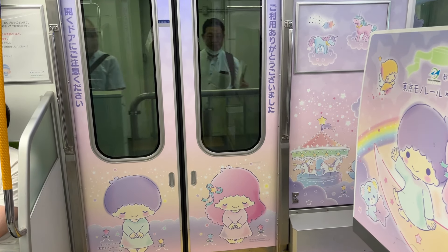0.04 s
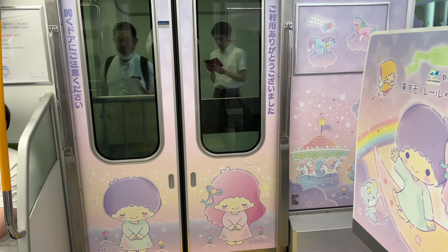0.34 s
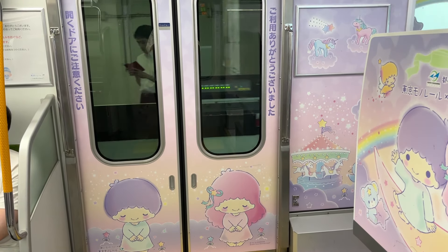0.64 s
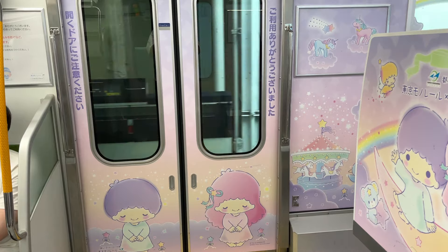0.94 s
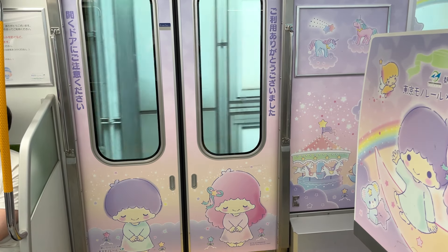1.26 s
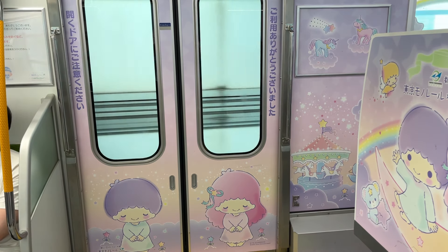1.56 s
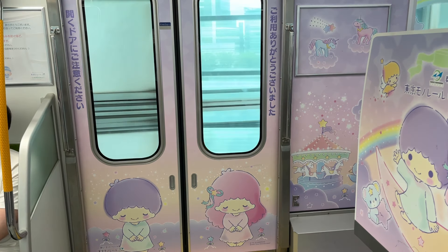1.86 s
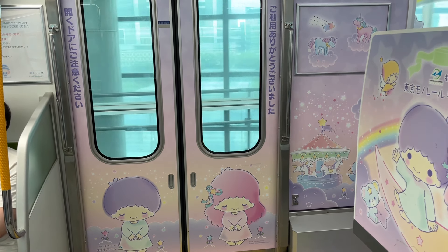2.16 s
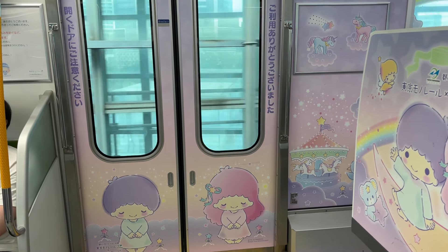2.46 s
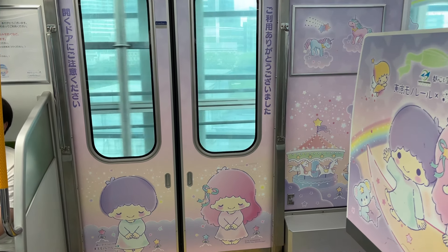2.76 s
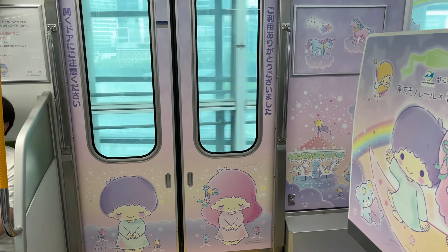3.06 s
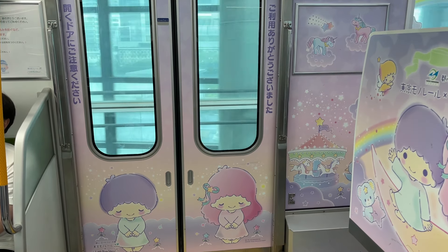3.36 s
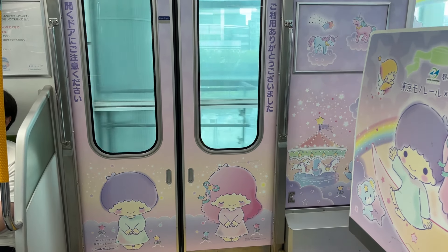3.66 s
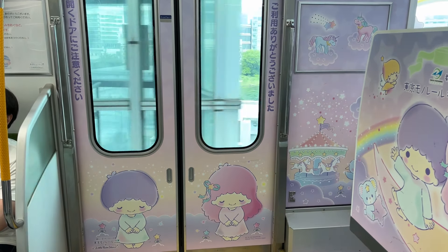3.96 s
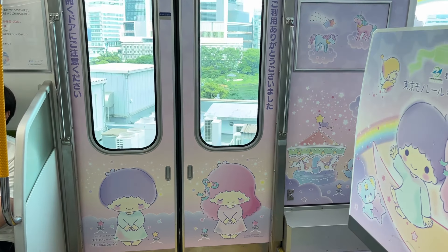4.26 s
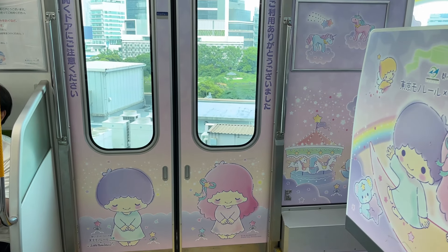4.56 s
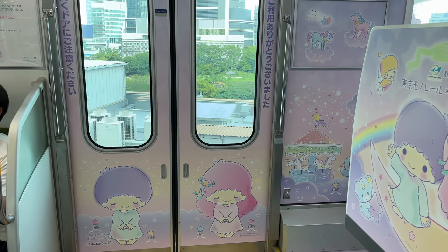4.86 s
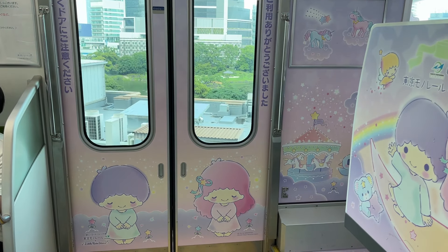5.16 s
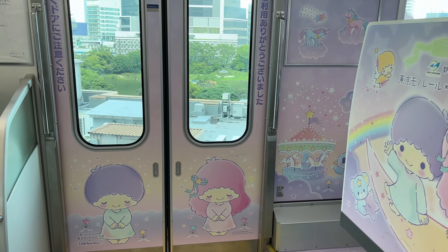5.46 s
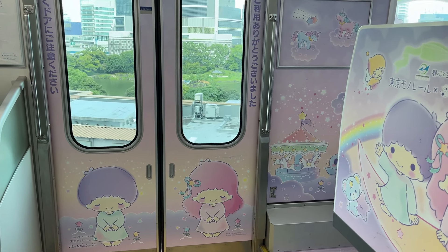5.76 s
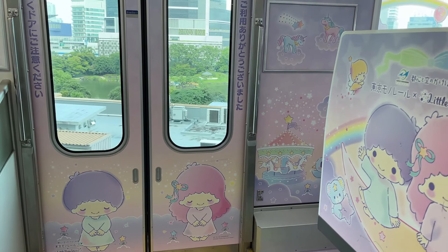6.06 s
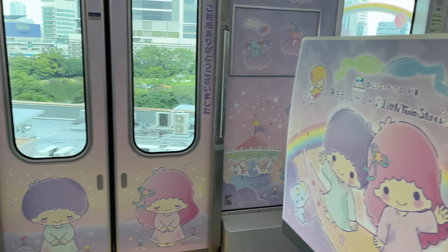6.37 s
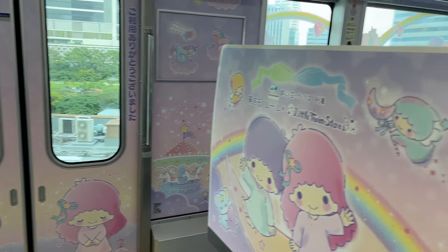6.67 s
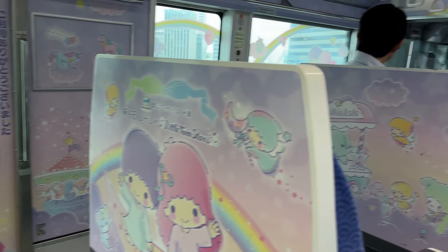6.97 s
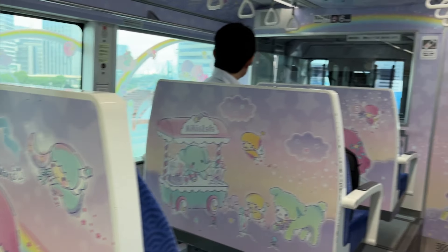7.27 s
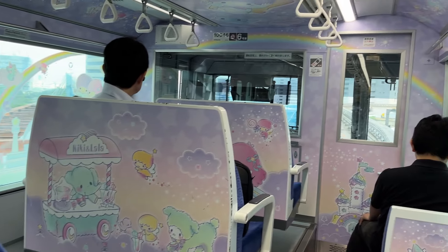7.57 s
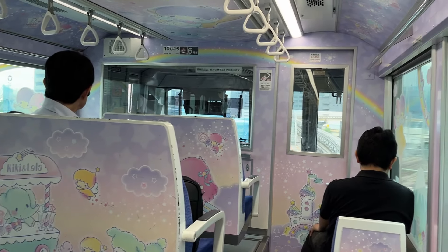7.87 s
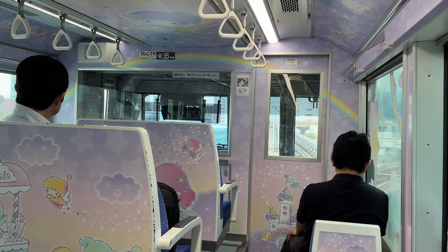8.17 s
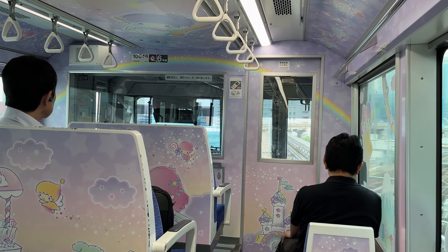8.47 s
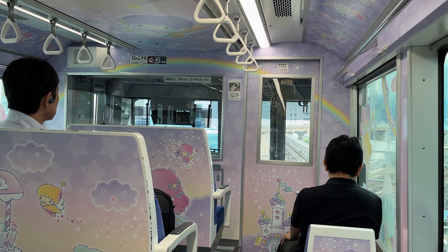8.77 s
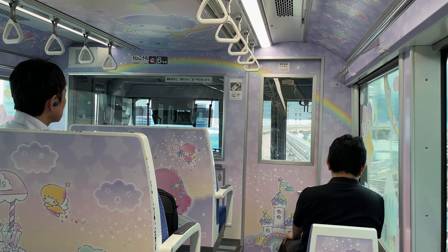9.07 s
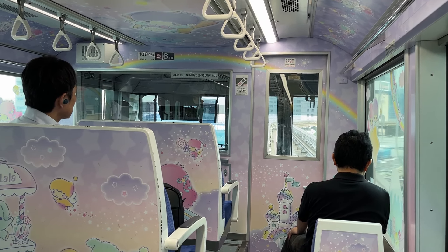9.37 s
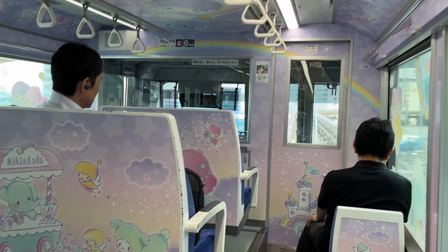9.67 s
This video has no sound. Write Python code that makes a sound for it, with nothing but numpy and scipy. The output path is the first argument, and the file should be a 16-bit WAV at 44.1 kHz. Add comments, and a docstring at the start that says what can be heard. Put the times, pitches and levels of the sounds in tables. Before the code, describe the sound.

A monorail car runs at steady speed, heard from inside the cabin. Deep tyre rumble, an electrical hum and a soft vent hiss continue for the whole ten seconds or so. A low drone dips around 2.5 seconds and swells back by 4. Small hard fixtures click lightly at the start, in a cluster between 2.4 and 2.8 seconds, at 4.1 and again around 5.6. Faint rustles, like cloth or a bag, come and go, with a short squeaky scrape at 6 seconds. A thin motor whine emerges at about 3.5 seconds and fades by 9. At 6.7 seconds the car knocks hard and dully over a joint, and its panels shudder for a third of a second. The hum shifts between the ears as the microphone turns, from 6.5 to 7.4 seconds. Softer bumps follow around 8.1 and 9.3 seconds as the ride grows slightly rougher.

```python
"""Inside a monorail car at steady speed.

Tyres rumble on the beam, the running gear drones in slow swells, the power supply hums, vents blow.
Light clicks, rustles and a scrape sound in the cabin. The car knocks hard over a joint in the beam,
shudders and takes a few softer bumps. The hum shifts as the microphone turns to the front."""
import sys
import numpy as np
from scipy import signal
from scipy.fft import rfft, irfft, next_fast_len
from scipy.io import wavfile
from scipy.ndimage import uniform_filter1d, minimum_filter1d, map_coordinates

SR = 44100
rng = np.random.default_rng(int(sys.argv[2]) if len(sys.argv) > 2 else 0)


def waveform_to_disk(signal):
    """Save audio, clipped to [-1, 1], as 16-bit WAV at the path in sys.argv[1]."""
    frames = np.transpose(np.atleast_2d(signal))
    scaled = np.clip(frames, -1, 1) * 32767
    samples = np.round(scaled).astype(np.int16)
    wavfile.write(sys.argv[1], SR, samples)


N = 428652

DRONE_HZ, SUPPLY_HZ = 95.65, 120
TURN_START_S, TURN_LENGTH_S = 6.44, 0.94
EAR_SPLIT = np.array([[.5], [-.5]])  # half a left-right difference to each ear

# Cabin noise coherence. Each row: frequency in Hz, left-right correlation.
EAR_COHERENCE = [(45, .99), (90, .97), (140, .86), (290, .6), (630, .35), (1300, -.05), (2500, .25),
                 (4500, .1), (6500, 0), (8300, -.6), (10500, .4), (14000, 0)]
# Cabin noise balance. Each row: frequency in Hz, left minus right in dB.
EAR_BALANCE_DB = [(60, -1), (200, -0.5), (400, 1), (700, 2), (1270, -1), (2330, 2), (4300, 7), (8000, -0.5),
                  (14000, 0)]
# Cabin decay. Each row: frequency in Hz, T60 in seconds.
CABIN_T60_S = [(200, .35), (3000, 0.38), (8000, 0.24), (15000, 0.18)]
# Airy hiss of vents and tyres. Each row: frequency in Hz, relative density in dB.
AIR_SPECTRUM_DB = [(500, -20), (1500, -2.5), (2000, -2.3), (2550, .5), (3500, -3.8), (5000, -8),
                   (6200, -11), (7300, -15), (8300, -30), (9500, -23), (11000, -23), (13000, -25.5),
                   (15000, -32)]
# Fine high tyre hiss. Each row: frequency in Hz, relative density in dB.
FIZZ_SPECTRUM_DB = [(5000, -14), (7200, -8), (8300, -30), (9600, 0), (12000, -1), (15000, -8)]
# Slow swells of the drone's fundamental. Each row: time in seconds, level in dB.
DRONE_SWELL_DB = [(0, -25.5), (.9, -25), (1.7, -28.5), (2.5, -37.5), (3.5, -35), (4.3, -26), (6, -25),
                  (7.4, -29.5), (8.4, -29.5), (9.3, -23), (9.7, -25)]
# Upper drone orders. Each row: multiple of DRONE_HZ, level in dB.
DRONE_HARMONICS = [(3, -51), (4, -45.5), (10, -56), (11, -59), (13, -60.5)]
# Upper supply orders. Each row: multiple of SUPPLY_HZ, level in dB.
SUPPLY_HARMONICS = [(5, -57), (6, -62), (24, -76), (28, -72), (40, -79)]
# Drone order 2, facing door then front. Each row: left in dB, right in dB, left lead in radians.
DRONE_2_EARS = [(-42, -37.5, -1.6), (-34, -29.8, -.1)]
# Supply order 3, facing door then front. Each row: left in dB, right in dB, left lead in radians.
SUPPLY_3_EARS = [(-48, -40, 1.3), (-34.5, -48, 1.4)]
# Supply order 4, facing door then front. Each row: left in dB, right in dB, left lead in radians.
SUPPLY_4_EARS = [(-47, -47.2, -.25), (-58, -50, -1.5)]
# Thin fan and motor whines. Each row: frequency in Hz, level in dB.
STEADY_WHINES = [(533, -58), (1469, -66), (3052, -72), (7284, -86)]
# Swelling motor whine. Each row: time in seconds, frequency in Hz, level in dB.
MOTOR_TRACK = [(3.2, 886, -72), (3.6, 887, -55), (4.1, 888, -51.5), (5.3, 888.5, -52), (6.6, 886.5, -54),
               (7.25, 885.5, -48), (7.55, 885.5, -59), (8.6, 885, -57.5), (9.1, 884, -72)]
# Tyre rumble. Each row: frequency in Hz, relative density in dB.
RUMBLE_SPECTRUM_DB = [(15, -62), (26, -22), (36, -15.5), (45, -4.5), (56, 3), (70, -5), (88, 0.5),
                      (115, -11), (200, -26.5), (500, -93)]
# Car body boom. Each row: frequency in Hz, relative density in dB.
BOOM_SPECTRUM_DB = [(50, -15.5), (90, -1.5), (120, 2.5), (180, 0), (210, -7), (260, -7.5), (400, -23),
                    (700, -24), (2000, -79.5)]
# Tyre roar. Each row: frequency in Hz, relative density in dB.
ROAR_SPECTRUM_DB = [(90, -38.5), (220, 2), (330, 5), (450, 1.5), (620, -2.5), (800, -3), (1050, -4),
                    (1280, -8.5), (1560, -11), (1750, -15), (2600, -22.5), (6000, -80)]
# Tyre noise off trackside walls. Each row: frequency in Hz, relative density in dB.
WALL_SPECTRUM_DB = [(900, -15.5), (1300, -6.5), (1430, 2), (1580, -6.5), (1750, -11), (2500, -16.5),
                    (5000, -30.5), (8000, -54)]
# Rough stretches of beam. Each row: start in seconds, length in seconds, extra shaking in dB.
ROUGH_STRETCHES = [(.61, 0.073, 2), (2.546, 0.22, 2.5), (3.91, 0.43, 5.5), (5.477, 0.47, 5), (6.19, .12, 4),
                   (6.635, 0.36, 7), (7.85, 0.46, 6.5), (8.55, 0.28, 6), (9.032, 0.4, 7)]
# Small hard fixtures clicking. Each row: start in seconds, strength in dB, treble lift in dB,
# left minus right below the treble in dB, attack in seconds.
FIXTURE_CLICKS = [(.085, -18, 0.5, 6, .002), (0.188, -11.5, -21, 5, .003), (2.357, -3.5, -1, 6, 0.0012),
                  (2.517, -10.5, -8, 7, .001), (2.7716, 1, -2.5, 7, 0.00033), (2.779, -5, -5, 2.5, 0.0011),
                  (2.793, -8.5, -4, 4, .001), (4.102, -6, -1, 5, .008), (5.58, -5.3, 2.5, 4, .0005),
                  (5.671, -9, 0.5, 5, .0005), (5.7895, -11.5, -4, 6, 0.0053), (7.85, -22.5, 3, 2, .002)]
# Ring of the fixtures. Each row: frequency in Hz, relative level in dB, T60 in seconds.
FIXTURE_MODES = [(1335, -12, .09), (1943, -13, .09), (3160, -6, .1), (3472, 0, .04), (3989, -8, .08),
                 (4813, -9, .04)]
# Click colour. Each row: frequency in Hz, gain in dB.
CLICK_EQ_DB = [(400, -21), (1300, 0), (2200, 2), (3300, 0), (5000, 0.5), (7200, -3), (8300, -16),
               (9500, -4.5), (12000, -5), (15000, -12)]
# Rustles and scuffs. Each row: peak time in seconds, level in dB, half length in seconds,
# band centre in Hz, treble lift in dB.
RUSTLE_EVENTS = [(0.207, -49, 0.037, 4600, -8), (0.62, -51.5, 0.032, 6000, -8),
                 (1.17, -48.5, 0.051, 3350, -10), (2.625, -51.5, 0.017, 4500, -4),
                 (2.714, -52.5, 0.045, 3600, 3), (4.189, -47.5, .036, 2700, -13),
                 (4.365, -47.5, .055, 3140, -10), (4.566, -46.5, 0.05, 3080, -13),
                 (5.249, -46, 0.038, 2980, -15.5), (6.041, -47.5, 0.081, 4500, 3),
                 (6.085, -46, 0.099, 2250, -2), (6.13, -48, .06, 1460, -4), (6.318, -58, 0.1, 10700, 4),
                 (8.447, -51.5, 0.07, 5460, -1), (8.549, -48.5, .025, 2900, -10),
                 (8.693, -48.5, 0.025, 5250, -7.5), (8.93, -50, .03, 3000, -9),
                 (9.114, -47, 0.052, 4200, -2), (9.22, -50.5, .09, 3800, -1)]
# Rustle colour. Each row: frequency in Hz, relative density in dB.
RUSTLE_SPECTRUM_DB = [(600, -25), (1300, 3), (2200, 1.5), (3500, 0), (5200, -3), (7300, -8), (8300, -18),
                      (9500, -10.5), (12000, -11.5), (15000, -19)]
# Catches of a scrape. Each row: peak time in seconds, level in dB, half length in seconds, pitch in Hz.
SCRAPE_SQUEAKS = [(6.02, -51, .014, 4650), (6.028, -46.5, .008, 3920), (6.052, -47, .012, 2880),
                  (6.064, -49, .014, 2200), (6.076, -48, .014, 3660), (6.117, -37.5, .005, 1340)]
# Panel shudder. Each row: frequency in Hz, relative density in dB.
SHUDDER_SPECTRUM_DB = [(40, -21), (80, 2), (170, 1.5), (280, -4), (380, -10.5), (600, -35), (1000, -71.5)]
# Ring of the body panels. Each row: frequency in Hz, level before filtering in dB, rise in seconds.
PANEL_MODES = [(80, -22, 0.0088), (182.3, -18.5, 0.016), (500, -4, 0.00095)]
# Blows on the car body. Each row: start in seconds, strength in dB, thud pitch in Hz.
BODY_BLOWS = [(6.682, -11.5, 80), (6.7076, 2, 235), (6.768, -11, 151), (6.779, -21, 402), (6.784, -9, 65),
              (6.8, -14.5, 60), (6.9, -19, 278), (6.907, -15, 85), (6.93, -11, 170), (7.012, -19, 280),
              (7.045, -10, 75), (7.195, -16, 80), (8.086, -11, 120), (8.139, -11, 130), (8.203, -8, 74),
              (9.25, -9, 89)]


def amp(db):
    """Decibels to gain."""
    return 10 ** (np.asarray(db) / 20)


def unit(x):
    """Scale to rms 1."""
    return x / np.sqrt(np.mean(x ** 2) + 1e-20)


def along(points, hz):
    """Interpolate (Hz, value) points on a log frequency axis."""
    knots_hz, values = np.transpose(points)
    return np.interp(np.log(hz + 1), np.log(knots_hz + 1), values)


def treble(hz):
    """Share of a treble lift at each frequency."""
    return along([(4000, 0), (12000, 1.0)], hz)


def wobble(rate_hz):
    """Smooth random curve, rate_hz knots a second."""
    grid = np.arange(0, N + 128, 128)
    knots = rng.standard_normal(int(N * rate_hz / SR) + 4)
    return np.interp(np.arange(N), grid, map_coordinates(knots, [grid * rate_hz / SR], mode="nearest"))


def filtered(x, response):
    """Apply a gain given as a function of Hz."""
    n = x.shape[-1]
    padded = next_fast_len(n + 8192)
    return irfft(rfft(x, padded) * response(np.fft.rfftfreq(padded, 1 / SR)), padded)[..., :n]


def add(track, start_s, sound):
    """Mix a sound into a track."""
    part = track[:, round(start_s * SR):][:, :sound.shape[-1]]
    part += sound[..., :part.shape[-1]]


def cabin_noise(spectrum_db, patchy_db):
    """Stereo noise of rms 1 with patches of random gain; bass shared, treble diffuse."""
    def mid_side_gain(hz):
        angle = np.arccos(np.clip(along(EAR_COHERENCE, hz), -1, 1)) / 2
        return amp(along(spectrum_db, hz)) * np.array([np.cos(angle), np.sin(angle)])

    bins = signal.stft(rng.standard_normal((2, N)), nperseg=512)[2]
    patches = uniform_filter1d(rng.standard_normal(bins.shape[1:]), size=6, axis=0)
    patches = uniform_filter1d(patches, size=16, axis=1)
    pair = signal.istft(bins * amp(patchy_db * unit(patches)), nperseg=512)[1][:, :N]
    mid, side = filtered(pair, mid_side_gain)
    ears = np.array([mid + side, mid - side])
    return unit(filtered(ears, lambda hz: amp(EAR_SPLIT * along(EAR_BALANCE_DB, hz))))


def cabin_tail():
    """Fresh diffuse cabin response, energy about 1 per ear; treble dies first."""
    hz, t, bins = signal.stft(rng.standard_normal((2, SR // 2)), SR, nperseg=256)
    decay = amp(-60 * t / along(CABIN_T60_S, hz)[:, None])
    tail = signal.istft(bins * decay, SR, nperseg=256)[1]
    return tail / np.linalg.norm(tail[0])


def tone(hz, drift, waver_db):
    """Tone of rms 1; shifting standing waves move its level and each ear's phase."""
    phase = 2 * np.pi * hz * np.cumsum(1 + drift) / SR
    spread_rad = np.sqrt(np.clip(1 - along(EAR_COHERENCE, hz), 0, 1))
    ears = np.array([np.sin(phase + spread_rad * wobble(1.315)) for ear in range(2)])
    return unit(ears * amp(waver_db * wobble(5)))


def standing_wave(hz, drift, ears, waver_db, flutter_db):
    """Fluttering tone; level and phase per ear shift as the microphone turns from door to front."""
    door, front = [amp([[left], [right]]) * np.exp(1j * lead * EAR_SPLIT) for left, right, lead in ears]
    turn = np.clip((np.arange(N) / SR - TURN_START_S) / TURN_LENGTH_S, 0, 1)
    gain = door + (front - door) * np.sin(np.pi / 2 * turn) ** 2
    phase = 2 * np.pi * hz * np.cumsum(1 + drift) / SR
    flutter = amp(waver_db * wobble(5) + flutter_db * wobble(30))
    return np.sqrt(2) * np.imag(gain * np.exp(1j * phase)) * flutter


def shaking(attack_s=0.065, release_s=0.2, rise_db_per_s=0.5):
    """Shaking in dB above a smooth ride: a slowly roughening beam plus rough stretches."""
    t = np.arange(N) / SR
    shake_db = rise_db_per_s * t
    for start_s, length_s, db in ROUGH_STRETCHES:
        attack = np.clip((t - start_s) / attack_s, 0, 1)
        release = np.exp(-np.maximum(t - start_s - length_s, 0) / release_s)
        shake_db += db * attack * release
    return shake_db


def hiss(shake_db, air_db=-51.5, fizz_db=-72.5):
    """Airy hiss of vents and tyres; the tyre hiss grows and brightens on rough beam."""
    air = amp(air_db + 0.1 * shake_db) * cabin_noise(AIR_SPECTRUM_DB, patchy_db=.8)
    fizz = amp(fizz_db + 0.61 * shake_db) * cabin_noise(FIZZ_SPECTRUM_DB, patchy_db=1)
    return air + fizz


def motor_whine():
    """A motor whine emerges, sags slightly in pitch and dies away."""
    t = np.arange(N) / SR
    times_s, hz, db = np.transpose(MOTOR_TRACK)
    drift = np.interp(t, times_s, hz) / hz[0] - 1
    return amp(np.interp(t, times_s, db)) * tone(hz[0], drift, waver_db=1.5)


def supply_whistle(peak_s=7.78, half_s=.32, level_db=-61.5, pan_db=6):
    """Supply order 27 swells once, mostly on the left."""
    swell = np.exp(-((np.arange(N) / SR - peak_s) / half_s) ** 2)
    whistle = tone(27 * SUPPLY_HZ, .0002 * wobble(2), waver_db=1)
    return amp(level_db + EAR_SPLIT * pan_db) * swell * whistle


def machines():
    """Running gear drone, power supply hum, thin fan and motor whines."""
    gear_drift, supply_drift = 0.0012 * wobble(2.5), 0.000293 * wobble(1.532)
    swell_db = np.interp(np.arange(N) / SR, *np.transpose(DRONE_SWELL_DB))
    out = amp(swell_db) * tone(DRONE_HZ, gear_drift, waver_db=0.7)
    out += standing_wave(2 * DRONE_HZ, gear_drift, DRONE_2_EARS, waver_db=1, flutter_db=2)
    out += standing_wave(3 * SUPPLY_HZ, supply_drift, SUPPLY_3_EARS, waver_db=.7, flutter_db=1)
    out += standing_wave(4 * SUPPLY_HZ, supply_drift, SUPPLY_4_EARS, waver_db=1.2, flutter_db=1.5)
    for order, db in DRONE_HARMONICS:
        out += amp(db) * tone(order * DRONE_HZ, gear_drift, waver_db=2.5)
    for order, db in SUPPLY_HARMONICS:
        out += amp(db) * tone(order * SUPPLY_HZ, supply_drift, waver_db=2.2)
    for hz, db in STEADY_WHINES:
        out += amp(db) * tone(hz, .0008 * wobble(3), waver_db=3)
    return out


def rustles(band_db=1.5, grain_db=1.8):
    """Brief grainy swishes, as of sliding cloth or a bag; each favours its own band."""
    out, t = np.zeros((2, N)), np.arange(SR) / SR
    for peak_s, db, half_s, centre_hz, lift_db in RUSTLE_EVENTS:
        def colour(hz):
            band = 1 + amp(band_db) / (1 + (np.log((hz + 1) / centre_hz) / .12) ** 2)
            shape_db = along(RUSTLE_SPECTRUM_DB, hz) + lift_db * treble(hz)
            return amp(shape_db + EAR_SPLIT * along(EAR_BALANCE_DB, hz)) * band

        start_s = max(peak_s - .5, 0)
        swish = unit(filtered(rng.standard_normal((2, SR)), colour))
        grain = amp(grain_db * wobble(140)[:SR])
        swell = np.exp(-((start_s + t - peak_s) / half_s) ** 2)
        add(out, start_s, amp(db) * swell * grain * swish)
    return out


def scrape(droop_per_s=1.2, jitter=.07, room_db=-4):
    """Stick and slip: short rough squeaks droop in pitch and ring on in the cabin."""
    out, t = np.zeros((2, N)), np.arange(SR // 5) / SR - .1
    for peak_s, db, half_s, hz in SCRAPE_SQUEAKS:
        pitch_hz = hz * (1 - droop_per_s * t + jitter * wobble(500)[:len(t)])
        swell = amp(db) * np.exp(-(t / half_s) ** 2)
        squeak = swell * np.sqrt(2) * np.sin(2 * np.pi * np.cumsum(pitch_hz) / SR)
        add(out, peak_s + t[0], squeak)
        add(out, peak_s + t[0], amp(room_db) * signal.fftconvolve(squeak[None], cabin_tail(), axes=1))
    return out


def clicks(crack_db=-5, crack_t60_s=.035, ring_db=-13, tail_db=-2.3):
    """Hard fixtures click: a short crack, a modal ring and the cabin's tail."""
    out = np.zeros((2, N))
    for start_s, db, lift_db, pan_db, attack_s in FIXTURE_CLICKS:
        def colour(hz):
            balance_db = EAR_SPLIT * pan_db * (1 - treble(hz))
            return amp(along(CLICK_EQ_DB, hz) + lift_db * treble(hz) + balance_db)

        tail = cabin_tail()
        t = np.arange(tail.shape[1]) / SR
        crack = rng.standard_normal(len(t)) * amp(-60 * t / crack_t60_s)
        ring = np.zeros_like(tail)
        for hz, mode_db, t60_s in FIXTURE_MODES:
            phase = 2 * np.pi * hz * t + rng.standard_normal((2, 1))
            ring += amp(mode_db - 60 * t / t60_s) * np.sin(phase)
        hit = amp(tail_db) * tail + amp(crack_db) * crack / np.linalg.norm(crack)
        hit += amp(ring_db) * ring / np.linalg.norm(ring)
        attack = 1 - np.exp(-t / attack_s)
        add(out, start_s, amp(db) * filtered(hit * attack, colour))
    return out


def tyres(shake_db, rumble_db=-30.5, boom_db=-32.5, roar_db=-36.5, wall_db=-47):
    """Tyres on the beam: rumble, body boom, roar and a wall echo that fades past the walls."""
    walls_end_s, fade_db_per_s = 2.07, 12
    fade_db = fade_db_per_s * np.maximum(np.arange(N) / SR - walls_end_s, 0)
    rumble = amp(rumble_db + 0.9 * shake_db) * cabin_noise(RUMBLE_SPECTRUM_DB, patchy_db=1.0)
    boom = amp(boom_db + 0.44 * shake_db) * cabin_noise(BOOM_SPECTRUM_DB, patchy_db=1.37)
    roar = amp(roar_db + 0.12 * shake_db) * cabin_noise(ROAR_SPECTRUM_DB, patchy_db=1.0)
    echo = amp(wall_db - fade_db) * cabin_noise(WALL_SPECTRUM_DB, patchy_db=1.5)
    return rumble + boom + roar + echo


def shudder(start_s=6.715, attack_s=.01, hold_s=0.31, release_s=0.044, level_db=-27.5):
    """Body panels rumble on unevenly after the hard knock."""
    t = np.arange(N) / SR - start_s
    attack = np.clip(t / attack_s, 0, 1)
    release = np.exp(-np.maximum(t - hold_s, 0) / release_s)
    lumps_db = 1.5 * wobble(30)
    return amp(level_db + lumps_db) * attack * release * cabin_noise(SHUDDER_SPECTRUM_DB, patchy_db=3.0)


def beam_knocks(rise_cycles=0.51, cutoff_hz=740):
    """Joint and bumps: dull thuds of a cycle or two, then a faint panel ring."""
    out, t = np.zeros((2, N)), np.arange(SR // 2) / SR

    def pulse(hz, rise_s):
        """Heavy panels take a moment to move, then die away fast."""
        return (t / rise_s * np.exp(1 - t / rise_s)) ** 2 * np.sin(2 * np.pi * hz * t)

    ring = sum(amp(db) * pulse(hz, rise_s) for hz, db, rise_s in PANEL_MODES)
    for start_s, db, hz in BODY_BLOWS:
        thud = pulse(hz, rise_cycles / hz)
        excited_band = signal.butter(2, [hz / 2, hz * 1.5], "bandpass", fs=SR)
        add(out, start_s, -amp(db) * (thud + signal.lfilter(*excited_band, ring)))
    return filtered(out, lambda hz: 1 / (1 + (hz / cutoff_hz) ** 6))


def scene():
    """Steady ride plus cabin sounds and knocks."""
    shake_db = shaking()
    ride = tyres(shake_db) + machines() + motor_whine() + supply_whistle() + hiss(shake_db)
    return ride + clicks() + rustles() + scrape() + beam_knocks() + shudder()


def record(dry):
    """Peak limiter just under full scale, then a band limit."""
    ceiling, window_samples, top_hz = .92, 441, 14600
    needed = np.minimum(1, ceiling / (np.abs(dry).max(axis=0) + 1e-9))
    gain = uniform_filter1d(minimum_filter1d(needed, size=window_samples), size=window_samples)
    return filtered(dry * gain, lambda hz: hz < top_hz)


dry = scene()
out = record(dry)
waveform_to_disk(out)
```